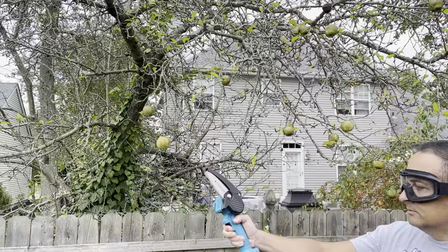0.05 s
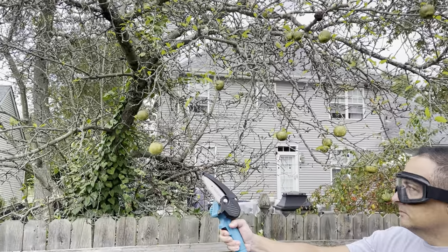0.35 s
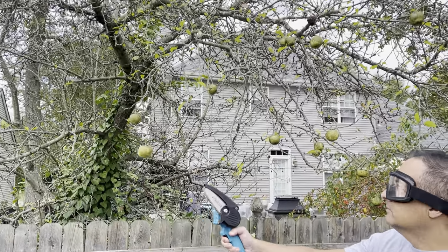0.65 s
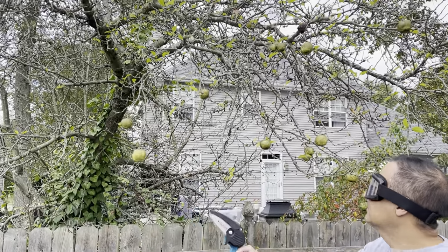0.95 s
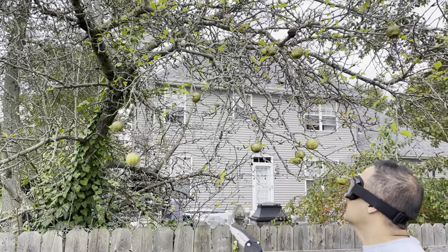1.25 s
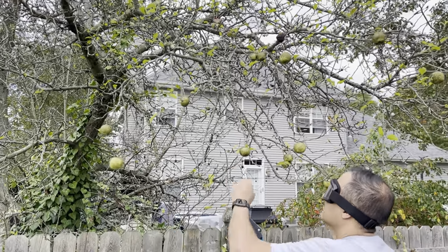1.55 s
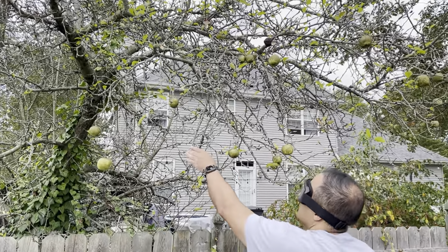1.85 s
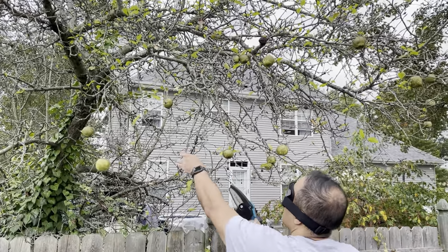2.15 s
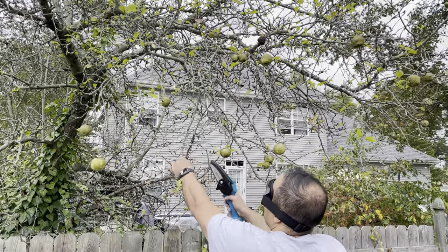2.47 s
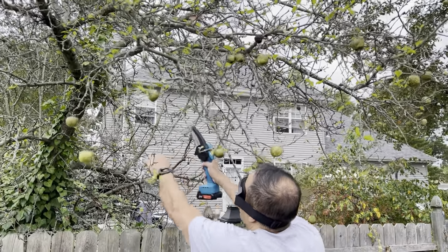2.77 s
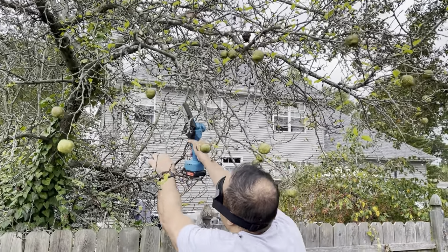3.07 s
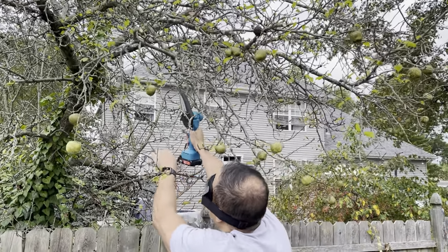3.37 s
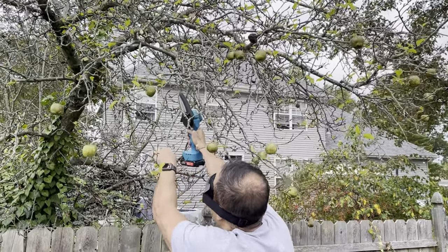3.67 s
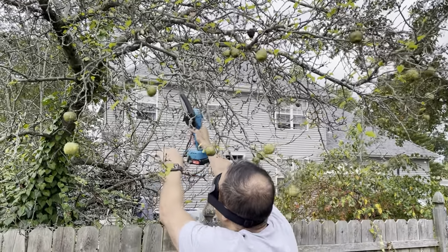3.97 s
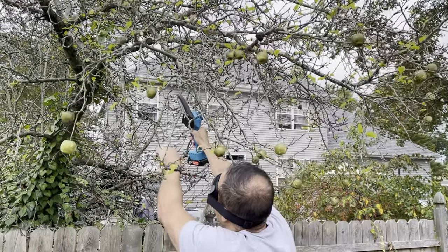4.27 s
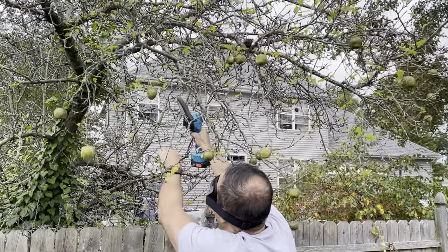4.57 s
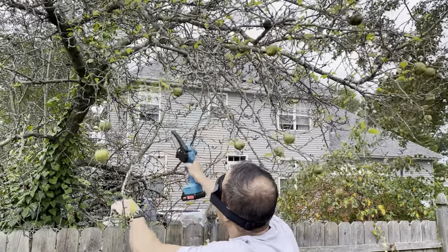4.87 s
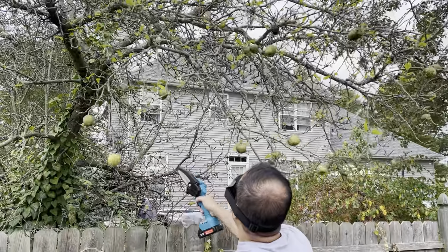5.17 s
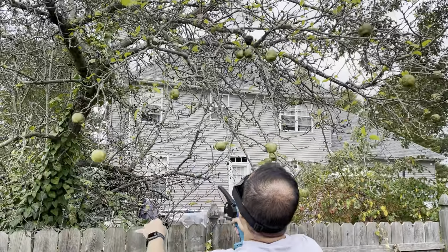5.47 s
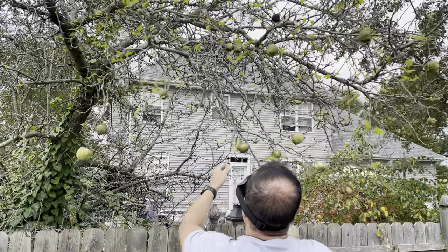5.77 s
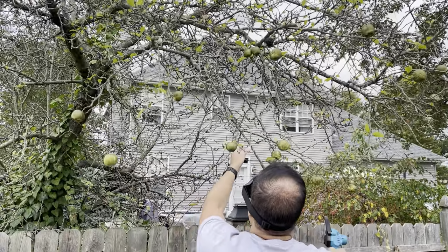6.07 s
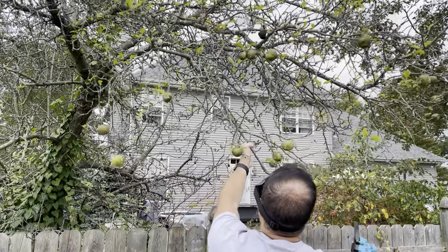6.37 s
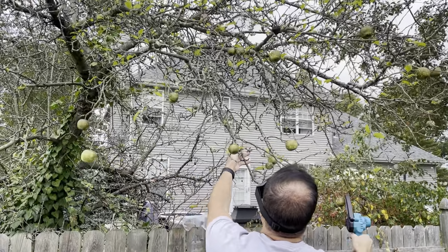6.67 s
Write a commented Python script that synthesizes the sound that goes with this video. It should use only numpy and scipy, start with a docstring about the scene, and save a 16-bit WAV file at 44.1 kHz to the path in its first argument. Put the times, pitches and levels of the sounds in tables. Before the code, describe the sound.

A small battery chainsaw whirs freely near the microphone, with a bright metallic hiss and a buzzing chain whose tone shifts as it moves. It slows and rasps through a thin branch, picks up speed, winds down for half a second, then returns to a steady whir. Faint low drones, an engine and a mains hum lie far off outdoors.

```python
"""A back yard, close to a cordless mini chainsaw, on a microphone with two ports. The saw runs free, bogs down
as it cuts a thin branch, coasts briefly and runs up again. Its chain knocks on housing and bar, the links
whine, scrape and sizzle, the cutters tear at the wood and the motor hums. Far off are an engine, low drones and
a steady hum."""
import sys
import numpy as np
from scipy import signal
from scipy.fft import rfft, irfft, next_fast_len
from scipy.io import wavfile

SR = 44100
rng = np.random.default_rng(int(sys.argv[2]) if len(sys.argv) > 2 else 0)


def persist_wave(psi):
    """Save psi, clipped to +-1, as 16-bit WAV."""
    counts = np.round(np.clip(psi, -1, 1) * 32767).astype(np.int16)
    wavfile.write(sys.argv[1], SR, np.atleast_2d(counts).T)


N = 301203
TIME = np.arange(N) / SR
LINK_COUNT, FREE_LINKS_PER_S = 28, 487.4  # links in the loop; their rate with nothing to cut

# how hard the teeth bite the wood: time_s, bite_db
BITE = [(2.9, -78), (3.1, -57.5), (3.3, -41), (3.46, -35.5), (3.65, -37.5), (3.76, -37.5), (3.98, -37),
        (4.1, -38), (4.56, -39.5), (4.72, -45.5), (5.1, -78.5)]


def link_rate():
    """Links per second: the motor sags under load, coasts with the trigger let go, then runs up."""
    # drag of the branch on the chain: time_s, load_share
    branch_drag = [(3.16, 0), (3.3, .18), (3.45, .48), (3.62, .68), (3.95, .6), (4.06, .85), (4.18, .73),
                   (4.27, 1), (4.65, .93), (4.76, .18), (4.88, 0)]
    release_s, pull_s, coast_s, run_up_s, settle_s = 4.945, 5.4, .8, .044, .15
    load_sag, settle_share = .155, .14
    load, = in_time(branch_drag)
    coasting = np.exp(-(np.clip(TIME, release_s, pull_s) - release_s) / coast_s)
    pulled_s = np.maximum(TIME - pull_s, 0)
    lag = (1 - settle_share) * np.exp(-pulled_s / run_up_s) + settle_share * np.exp(-pulled_s / settle_s)
    return FREE_LINKS_PER_S * (1 - load_sag * load) * (1 - (1 - coasting) * lag)


def chain_clatter(links, shake):
    """Knocks ring the housing and flex and twist the bar; loose links rattle and cutters tear."""
    # resonances: pitch_hz, width_hz, gain_db, reach_db, aside_db
    housing_modes = [(794, 136, -11, -1, 1.5), (1423, 310, -6, 4, -2.5), (1840, 394, 2.5, -3, -11),
                     (2090, 208, -3, 5.5, 0), (2310, 176, -9, 8.5, 4.5)]
    flex_modes = [(3178, 240, -7.5, 1, -5), (2840, 710, -10.5, -30, -0.5)]
    twist_modes = [(3560, 420, -0.5, 0.53, 1), (3853, 340, 0.5, 0.72, 6.5), (4400, 640, -1.5, 1, 2.2)]
    # response to pose and speed: front_db, lowered_db, reach_db, aside_db, speed_db_per_octave
    housing_gains = (-26, 1, -0.5, -8.5, 2.5)
    flex_gains = (-39, -2.5, 2, 2, 3.5)
    twist_gains = (-35, -6, 3, -1.5, 1)
    rattle_gains = (-37.5, -5.5, -1, 2, 6)
    # spectrum of loose links: pitch_hz, gain_db
    rattle_colour = [(100, -46), (280, -18), (470, -5), (800, 0), (1200, 2.5), (2600, 6.5), (5000, -7),
                     (9000, -28)]
    knocks = lambda: chain_knocks(links)
    housing = from_db(level_db(housing_gains, links) + 0.23 * shake) * resonate(knocks, housing_modes)
    rings = bar_rings(knocks())
    flex = from_db(level_db(flex_gains, links)) * resonate(knocks, flex_modes)
    twist = from_db(level_db(twist_gains, links)) * resonate(knocks, twist_modes)
    slips = friction(links, grains_per_s=4000, spread_db=1.0, throb=0.081)
    rattle = from_db(level_db(rattle_gains, links)) * coloured(slips, rattle_colour)
    return housing + rings + flex + twist + rattle + tearing(links, shake)


def chain_knocks(links):
    """A free chain repeats lap after lap; a slower one is tugged or slack and knocks at random."""
    speed = np.gradient(links)
    steady = (speed / speed.max()) ** 5
    repeating = rms_one(lap_knocks(links, memory=.93, slop_s=.000025, fresh=.36, per_link=14))
    loose = rms_one(friction(links, grains_per_s=5000, spread_db=1.0, throb=0.57))
    accent = 1 + .22 * np.cos(np.pi * links / 2)  # the cutter pattern returns every fourth link
    return accent * (steady * repeating + np.sqrt(1 - steady ** 2) * loose)


def lap_knocks(links, memory, slop_s, fresh, per_link):
    """Each link knocks at several places round the bar, in a pattern that slowly changes by the lap."""
    laps, per_lap = int(links[-1] / LINK_COUNT) + 1, LINK_COUNT * per_link
    places = (np.arange(laps)[:, None] + rng.random(per_lap)) * LINK_COUNT
    force = rng.standard_normal((laps, per_lap))
    for lap in range(1, laps):
        force[lap] = memory * force[lap - 1] + np.sqrt(1 - memory ** 2) * force[lap]
    force += fresh * rng.standard_normal(force.shape)
    when_s = np.interp(places, links, TIME, right=2 * TIME[-1])
    when_s += slop_s * rng.standard_normal(force.shape)
    at = np.round(when_s * SR).astype(int)
    inside = (at >= 0) & (at < N)
    return np.bincount(at[inside], force[inside], N)


def friction(links, grains_per_s, spread_db, throb):
    """Dense tiny slips of steel on steel, strongest twice per link."""
    slips = (rng.random(N) < grains_per_s / SR) * rng.standard_normal(N)
    return slips * from_db(spread_db * rng.standard_normal(N)) * (1 + throb * np.cos(4 * np.pi * links))


def bar_rings(knocks):
    """The bar and its mount ring up at single pitches as the chain shifts in its groove."""
    # swelling resonances: peak_s, half_length_s, pitch_hz, level_db
    rings = [(.2, 0.52, 810, -45), (.9, 0.55, 1890, -34.5), (2.847, 0.23, 2150, -34),
             (4.145, 0.64, 2190, -45), (5.655, 0.21, 2090, -37.5), (0.303, 0.6, 2880, -38),
             (.3, 0.37, 3920, -35.5), (.8, 0.23, 3760, -41), (1.29, 0.28, 5430, -38.5),
             (1.407, 0.3, 3190, -37), (1.917, 0.24, 3180, -38), (2.455, .3, 6150, -41),
             (2.66, 0.26, 3190, -33), (3.15, 0.14, 3960, -38), (4.45, 0.44, 4180, -38.5),
             (4.783, 0.17, 4440, -38), (5, 0.17, 3650, -38), (5.503, 0.11, 3240, -36.5),
             (5.6, 0.32, 4420, -40), (6.254, 0.16, 7360, -36.5), (6.41, 0.19, 5400, -40),
             (6.685, 0.26, 4510, -37.5)]
    return sum(from_db(db) * swell(s, half_s) * rms_one(resonance(knocks, hz, width_hz=340))
               for s, half_s, hz, db in rings)


def chain_scrape(links, shake):
    """Drive links slide in the groove and set the high modes of the bar hissing."""
    # high bar modes: pitch_hz, width_hz, gain_db, reach_db, aside_db
    modes = [(4820, 710, -6.5, 9.5, 3.2), (5366, 440, -0.5, 7.5, 5.9), (6140, 560, -0.5, -5, 2),
             (7700, 2400, -0.5, -11, 3.4), (6770, 1000, -2, 2, 1.7)]
    # response to pose and speed: front_db, lowered_db, reach_db, aside_db, speed_db_per_octave
    gains = (-35, -6, -1.5, 8, 10)
    hiss = resonate(lambda: friction(links, grains_per_s=16000, spread_db=2.5, throb=0.25), modes)
    return from_db(level_db(gains, links) + 0.54 * shake) * hiss


def chain_sizzle(links, shake):
    """The steel link plates sizzle on each other; the top is beamed and swells as the bar turns."""
    # spectrum of the plates: pitch_hz, gain_db
    colour = [(5500, -33), (7200, -18.5), (8000, -11), (9000, -4), (10000, -3), (10700, 1.5), (11400, -3.5),
              (12200, -11.5), (13200, -23), (14300, -34), (15600, -17.5)]
    # strength below and above beam_hz: time_s, lower_gain_db, top_gain_db
    gains = [(0.12, -28, -26.9), (0.4, -26.5, -27), (0.7, -28, -26.5), (0.95, -26, -28.5),
             (1.2, -27.5, -33.5), (1.4, -27.5, -35), (1.6, -32.5, -36.5), (1.85, -32, -38),
             (2.04, -35, -34.5), (2.25, -29, -32.5), (2.8, -29.5, -28.5), (3.15, -29, -24.5),
             (3.5, -28.5, -24), (3.72, -28, -23), (3.93, -25.5, -24.5), (4.12, -28, -25),
             (4.75, -31, -28.5), (4.97, -31, -27.5), (5.15, -33, -31), (5.36, -36.5, -36.5),
             (5.48, -29.5, -30.5), (5.7, -32.5, -32.5), (5.92, -33.5, -34.5), (6.1, -31.5, -30),
             (6.3, -29, -31), (6.55, -32.5, -31.5), (6.78, -28, -29.5)]
    beam_hz = 10310
    lower_db, top_db = in_time(gains)
    sizzle = coloured(friction(links, grains_per_s=18000, spread_db=-0.5, throb=0.24), colour)
    top = signal.sosfiltfilt(signal.butter(8, beam_hz, "high", fs=SR, output="sos"), sizzle)
    lower = from_db(lower_db - 1.5) * rms_one(sizzle - top)
    return from_db(0.92 * shake) * (lower + from_db(top_db - 0.66) * rms_one(top))


def chain_whine(links):
    """Links whine in step with the lap, which makes them buzz, and mesh with the sprocket."""
    # partials of the whine: cycles_per_lap, gain_db
    tones = [(84, -12), (105, -8), (112, 1.5), (113, -14), (119, -15), (126, -13), (140, -15), (169, -17),
             (182, -15)]
    # strength of the chain's tones: time_s, whine_db, mesh_db
    levels = [(.12, -32.5, -40), (.9, -30.5, -42.5), (1.03, -29.5, -45.5), (1.43, -35.5, -45.5),
              (1.75, -33.5, -41.5), (2.35, -37.5, -46.5), (2.85, -33.5, -47), (3.2, -36.5, -46.5),
              (3.55, -45, -45.5), (4.65, -60, -49), (4.95, -36, -50), (5.14, -57, -47), (5.22, -64, -67),
              (5.34, -66, -52), (5.41, -57, -51), (5.48, -48, -44.5), (5.58, -37.5, -55),
              (5.88, -41.5, -51), (6.1, -49, -68), (6.4, -46, -56), (6.8, -45, -46.5)]
    whine_db, mesh_db = in_time(levels)
    lap_angle = 2 * np.pi * links / LINK_COUNT
    whine = sum(from_db(whine_db + db + 1.1 * drift(10)) * np.cos(k * lap_angle) for k, db in tones)
    mesh = from_db(mesh_db + 1.3 * drift(12)) * np.sin(4 * np.pi * links)
    return whine + mesh


def motor_hum(links):
    """Motor and gear hum with a rough octave, quieter as they slow."""
    # motor and gear partials: cycles_per_link, gain_db
    tones = [(0.8484, 0), (1, -4), (9, 0), (11, 2)]
    # the hum at free speed: time_s, level_db
    levels = [(0, -57.5), (1.3, -51), (3, -55), (3.5, -61), (4.6, -61), (4.85, -56.5), (5.6, -52),
              (6.2, -50)]
    hum_db = in_time(levels)[0] + 21 * np.log2(link_rate() / FREE_LINKS_PER_S)
    octave = from_db(-3.0) * partials(2 * links, tones[:1], waver_db=4, waver_hz=15)
    return from_db(hum_db) * (partials(links, tones, waver_db=0.2, waver_hz=6.6) + octave)


def tearing(links, shake):
    """A cutter on every second link rips at the wood and sometimes catches with a knock."""
    # spectrum of tearing wood: pitch_hz, gain_db
    colour = [(50, -55), (170, -36), (400, -22), (560, -6.5), (780, -2), (950, -5), (1120, 2.5), (1400, -6),
              (2300, 1), (2600, -20), (3400, -15)]
    # cutters catching: start_s, relative_peak_db
    catches = [(3.395, -16), (3.518, -34), (3.635, -22), (3.694, -20), (3.729, -14), (3.781, -19),
               (3.801, -18), (3.828, -17), (3.865, -29), (3.911, -28), (3.973, -25), (4.015, -18),
               (4.219, -15)]
    rips = rng.standard_normal(N) * from_db(5.8 * np.cos(np.pi * links) + 2.0 * shake)
    force = from_db(in_time(BITE)[0]) + from_db(-11.5) * bursts(catches, decay_s=0.0044)
    return force * coloured(rips, colour)


def chopping(links):
    """Cutters strike the wood unevenly; each tone breaks up, and swells where it meets a resonance."""
    # tones of the cutters: cycles_per_lap
    orders = [14, 21, 28, 42, 49, 56, 70]
    # response of branch and bar: pitch_hz, gain_db
    colour = [(150, -13), (215, -15), (310, -18.5), (335, -11), (400, -15), (440, -8), (720, -13),
              (825, -1.5), (920, -19), (1100, -5)]
    hz, db = np.transpose(colour)
    laps, lap_hz = links / LINK_COUNT, link_rate() / LINK_COUNT
    tones = np.zeros(N)
    for k in orders:
        strength = from_db(np.interp(k * lap_hz, hz, db) + 3 * drift(14))
        tones += strength * np.sin(2 * np.pi * (k * laps + .08 * drift(14) + rng.random()))
    return from_db(in_time(BITE)[0] - 4.0) * tones


def snags():
    """A tooth snags in the branch with a short bright crack."""
    # cracks: start_s, relative_peak_db
    cracks = [(3.358, -9), (3.4364, -5), (3.4545, -6), (3.4825, -5.5), (3.527, -11)]
    colour = [(500, -27), (2000, -3), (7000, -8), (10800, 10), (14000, -27)]  # pitch_hz, gain_db
    return from_db(-7.0) * bursts(cracks, decay_s=0.0015) * coloured(rng.standard_normal(N), colour)


def pose():
    """How far the saw is lowered behind the arm, raised into the branch and swung to the right."""
    # the three movements: time_s, travel_share
    lowered = [(.5, 0.23), (1, 0.56), (1.35, 0.16), (1.58, 0.77), (2.03, 0.9), (2.2, 0.13), (2.6, 0)]
    reach = [(2.4, 0.28), (3.1, 0.75), (4.9, 0.87), (5.2, 0.47), (5.9, 0.13)]
    aside = [(5.7, 0.57), (5.95, 0.56), (6.1, 1), (6.35, 1), (6.8, 0.88)]
    return [np.clip(in_time(curve)[0], 0, 1) for curve in (lowered, reach, aside)]


def level_db(gains, links):
    """Level of a layer at the microphone, from the saw's distance, pose and chain speed."""
    # nearness as the arm moves the saw: time_s, gain_db
    nearness = [(.1, 2), (1.2, -0.75), (2.0, -3), (2.45, -5), (2.75, -3), (3.75, -0.76), (4.7, -4.5),
                (5.7, -5.5), (5.95, -6), (6.8, -4.5)]
    front_db, lowered_db, reach_db, aside_db, speed_db = gains
    lowered, reach, aside = pose()
    pose_db = front_db + lowered_db * lowered + reach_db * reach + aside_db * aside
    octaves = np.log2(np.gradient(links) * SR / FREE_LINKS_PER_S)
    return in_time(nearness)[0] + pose_db + speed_db * octaves


def microphone(direct, scattered):
    """Sound reaches the two ports out of step; sound scattered by the yard makes them less alike."""
    # the port pair: pitch_hz, right_lead_rad, likeness_share
    ports = [(50, -1, 0), (500, 0.43, 0.98), (1720, 0.17, 1), (2800, 1.05, 1), (3200, 0.42, 0.62),
             (3820, 0.53, 1), (5300, 1.0, 0.75), (6100, 0.46, 0.67), (8600, 1.03, 0.62), (8900, -1.5, 1),
             (9260, -1.14, 1), (10320, -3, 1), (11830, -6, 0.85), (13400, -8.5, 1)]
    size = next_fast_len(N)
    hz, *columns = np.transpose(ports)
    lead, alike = [np.interp(np.fft.rfftfreq(size, 1 / SR), hz, c) for c in columns]
    sides = np.array([[1], [-1]])
    common = np.sqrt((1 + alike) / 2) * rfft(direct, size)
    opposed = sides * np.sqrt((1 - alike) / 2) * rfft(scattered, size)
    return irfft((common + opposed) * np.exp(-1j * sides * lead / 2), size)[:, :N]


def interference(saw):
    """Parts of the saw cancel each other in bands; a reflection sweeps a null through the left port."""
    # passing gaps: peak_s, half_length_s, pitch_hz, width_hz, lost_share
    gaps = [(3, 1.6, 2650, 220, 0.55), (5.5, .6, 2610, 190, 0.6), (0.55, 0.44, 7040, 570, 0.7),
            (4.06, 0.48, 3030, 230, 0.65), (1.16, 0.33, 4100, 560, 0.38), (6.1, 0.2, 2000, 600, 0.37)]
    # the null: time_s, pitch_hz, strength (1 cancels, more inverts the band)
    left_null = [(.1, 5500, 1.4), (1.2, 5340, 1.4), (1.6, 5280, 1.8), (2.4, 5420, 1.2), (2.9, 5600, 0.059),
                 (5.2, 5610, 0.063), (5.42, 5475, 0.53), (5.57, 5450, 2), (5.76, 4800, 0.55),
                 (5.95, 4450, 2.4), (6.1, 3930, 0.8), (6.3, 3700, 1.7), (6.8, 3620, 0.93)]
    for s, half_s, hz, width_hz, lost in gaps:
        saw = saw - lost * swell(s, half_s) * band_around(saw, hz, width_hz)
    null_hz, strength = in_time(left_null)
    left, right = saw
    return np.array([left - strength * band_around(left, null_hz, width_hz=650), right])


def near_echo(x, delay_s, sway_s, echo_db):
    """An echo off arm and shoulder; its path sways, so the colour of the rasp keeps shifting."""
    late = TIME - delay_s - sway_s * drift(0.4)
    return x + from_db(echo_db) * np.array([np.interp(late, TIME, side) for side in x])


def far_engine():
    """A distant engine throbs at a wandering firing rate, with two faint overtones."""
    # the fundamental: time_s, level_db
    levels = [(.7, -60), (1.6, -65), (2.65, -58), (2.85, -48.5), (3.5, -49), (5.0, -49.5), (5.2, -62.5),
              (5.9, -49.5), (6.25, -61), (6.83, -48)]
    firing_hz = 56.9 + 0.796 * drift(1.64)
    angle = 2 * np.pi * np.cumsum(firing_hz) / SR
    fundamental = from_db(in_time(levels)[0] + 2.0 * drift(2.3)) * np.sin(angle)
    overtones = np.sin(2 * angle) + from_db(-10.0) * np.sin(3 * angle)
    return fundamental + from_db(-66 + 4.2 * drift(1.7)) * overtones


def soft_bump(start_s, pitch_hz, rise_s, peak_db):
    """One low, quickly damped bump."""
    age_s = np.maximum(TIME - start_s, 0)
    envelope = age_s / rise_s * np.exp(1 - age_s / rise_s)
    return -from_db(peak_db) * envelope * np.sin(2 * np.pi * pitch_hz * age_s)


def yard_ambience():
    """Low drones swell far off over a steady hum and outdoor rumble."""
    # distant drones: peak_s, pitch_hz, half_length_s, level_db
    swells = [(1.896, 82.6, 0.11, -50.5), (6.255, 116, 0.34, -49.5)]
    # spectrum of the rumble: pitch_hz, gain_db
    colour = [(24, -36), (36, -1), (50, 2), (85, 3.5), (140, -7.5), (250, -7.5), (500, -16), (2000, -32),
              (12000, -52)]
    drones = sum(from_db(db) * swell(s, half_s) * np.sin(2 * np.pi * hz * TIME)
                 for s, hz, half_s, db in swells)
    steady_hum = from_db(-59.5) * np.sin(2 * np.pi * 121 * TIME)
    return drones + steady_hum + from_db(-59.5) * coloured(rng.standard_normal(N), colour)


def from_db(db):
    """Decibels to gain."""
    return 10 ** (np.asarray(db) / 20)


def rms_one(x):
    """Scale to unit power."""
    return x / np.sqrt(np.mean(x ** 2) + 1e-20)


def in_time(rows):
    """Each column of a curve, sample by sample."""
    time_s, *columns = np.transpose(rows)
    return [np.interp(TIME, time_s, c) for c in columns]


def drift(rate_hz):
    """Slow random wander of unit power."""
    step, warm_up = 40, 2000
    r = np.exp(-2 * np.pi * rate_hz * step / SR)
    noise = rng.standard_normal(N // step + warm_up + 2)
    slow = signal.lfilter([1], [1, -2 * r, r * r], noise)[warm_up:]
    return np.interp(np.arange(N) / step, np.arange(len(slow)), rms_one(slow))


def swell(peak_s, half_s):
    """A smooth rise and fall."""
    return np.exp(-((TIME - peak_s) / half_s) ** 2)


def bursts(rows, decay_s):
    """Envelope of sudden blows that die away."""
    return sum(from_db(db) * (TIME >= s) * np.exp(-np.abs(TIME - s) / decay_s) for s, db in rows)


def partials(turns, orders, waver_db, waver_hz):
    """Sines locked to a rotation, each wavering in strength."""
    return sum(from_db(db + waver_db * drift(waver_hz)) * np.sin(2 * np.pi * (k * turns + rng.random()))
               for k, db in orders)


def coloured(x, spectrum):
    """Shape x by a spectrum, at unit power."""
    size = next_fast_len(N)
    hz, db = np.transpose(spectrum)
    bins_hz = np.maximum(np.fft.rfftfreq(size, 1 / SR), 1)
    gain = from_db(np.interp(np.log(bins_hz), np.log(hz), db))
    return rms_one(irfft(rfft(x, size) * gain, size)[:N])


def resonance(x, hz, width_hz):
    """A resonance applied twice, for steep skirts."""
    r = np.exp(-np.pi * width_hz * np.sqrt(2) / SR)
    b = (1 - r * r) / 2 * np.array([1, 0, -1])
    a = [1, -2 * r * np.cos(2 * np.pi * hz / SR), r * r]
    return signal.lfilter(b, a, signal.lfilter(b, a, x))


def resonate(excite, modes):
    """Modes, each driven by its own contacts and weighted by the pose; unit power in all."""
    _, reach, aside = pose()
    return rms_one(sum(from_db(db + reach_db * reach + aside_db * aside) * resonance(excite(), hz, width)
                       for hz, width, db, reach_db, aside_db in modes))


def band_around(x, hz, width_hz):
    """The part of x near a pitch that may glide."""
    turn = np.exp(2j * np.pi * np.cumsum(hz * np.ones(N)) / SR)
    r = np.exp(-np.pi * width_hz / SR)
    return 2 * np.real(turn * signal.lfilter([1 - r], [1, -r], x / turn))


def panned(x, pan_db):
    """Left louder by pan_db."""
    return x * from_db(np.array([[1], [-1]]) * pan_db / 2)


def scene():
    """The saw close to the microphone, driven by its chain speed and pose, with the yard behind."""
    bite_db, = in_time(BITE)
    _, reach, aside = pose()
    stutter = .0006 * drift(9) + .6 * from_db(bite_db) * drift(20)  # the wood tugs at the chain
    links = np.cumsum(link_rate() * (1 + stutter)) / SR  # count of links past the sprocket
    shake = drift(19) * (0.25 + from_db(bite_db + 31.0))  # the slack chain shakes, more so in wood
    direct = chain_clatter(links, shake) + chain_whine(links) + motor_hum(links) + chopping(links)
    body = microphone(direct, chain_clatter(links, shake))
    scrape = microphone(chain_scrape(links, shake), chain_scrape(links, shake))
    sizzle = microphone(chain_sizzle(links, shake) + snags(), chain_sizzle(links, shake))
    side_on = (1 - reach) * (1 - aside)
    shadow_hz = 600  # lower sound bends round the microphone and stays central
    lows = signal.sosfiltfilt(signal.butter(2, shadow_hz, fs=SR, output="sos"), body)
    highs = body - lows + panned(scrape, pan_db=-9 * side_on)
    saw = lows + panned(highs, pan_db=3.5 - 7.5 * aside) + sizzle
    saw = near_echo(interference(saw), delay_s=.0019, sway_s=0.00015, echo_db=-15.5)
    bump = soft_bump(start_s=1.2108, pitch_hz=225.6, rise_s=0.003, peak_db=-30.5)
    return saw + far_engine() + bump + yard_ambience()


def record(dry):
    """The sound opens abruptly; the highest treble is cut."""
    start_s, fade_s, cutoff_hz = 0.0815, 0.0027, 15800
    opened = np.clip((TIME - start_s) / fade_s, 0, 1)
    return signal.sosfilt(signal.ellip(10, .1, 80, cutoff_hz, fs=SR, output="sos"), dry * opened)


dry = scene()
out = record(dry)
persist_wave(out)
```